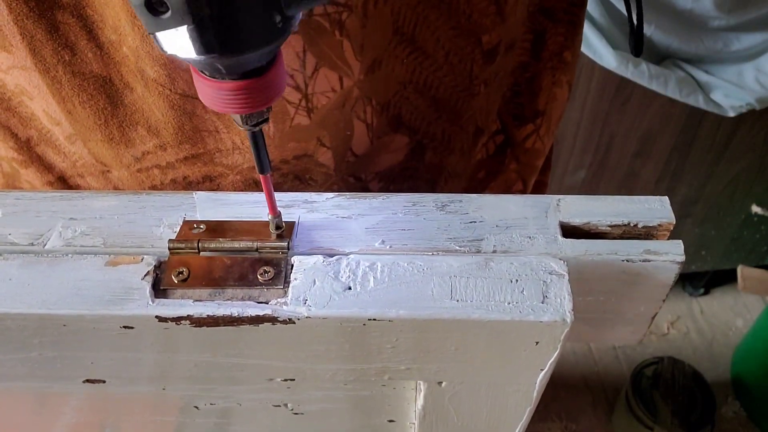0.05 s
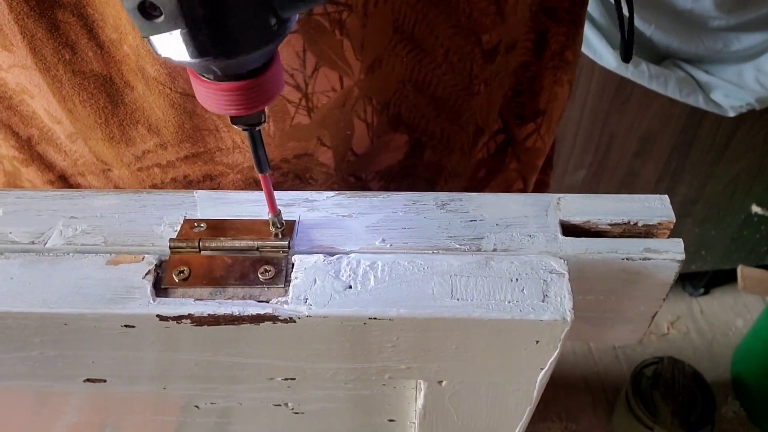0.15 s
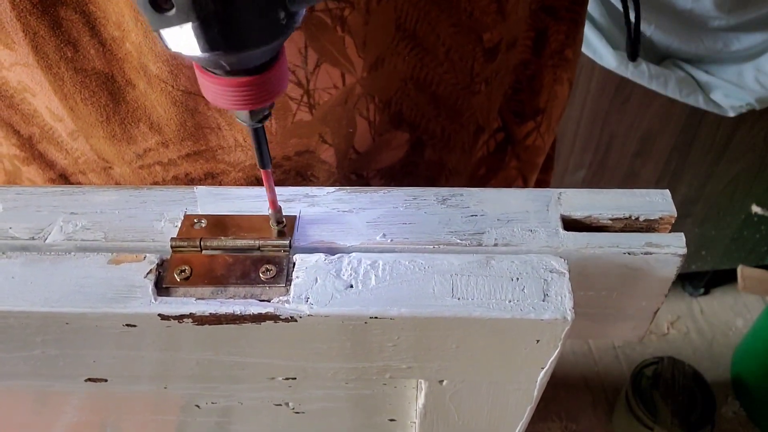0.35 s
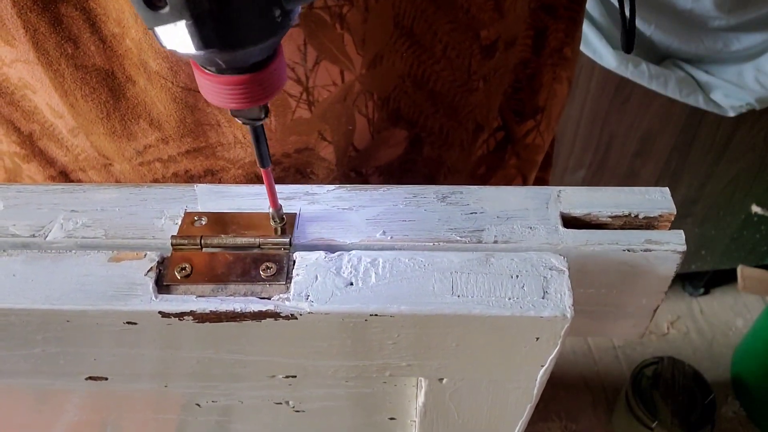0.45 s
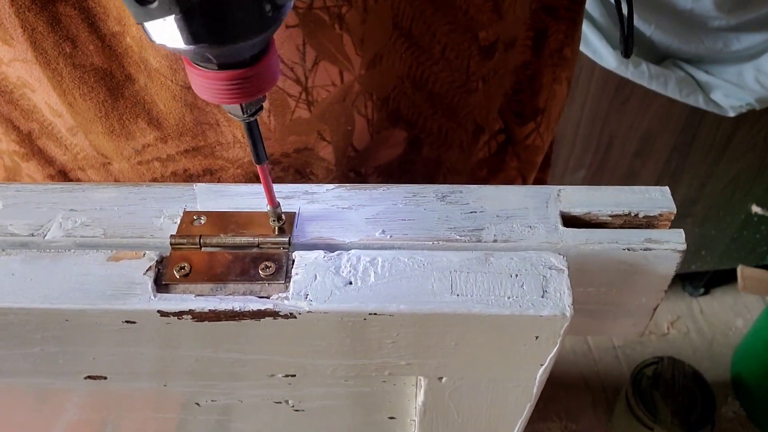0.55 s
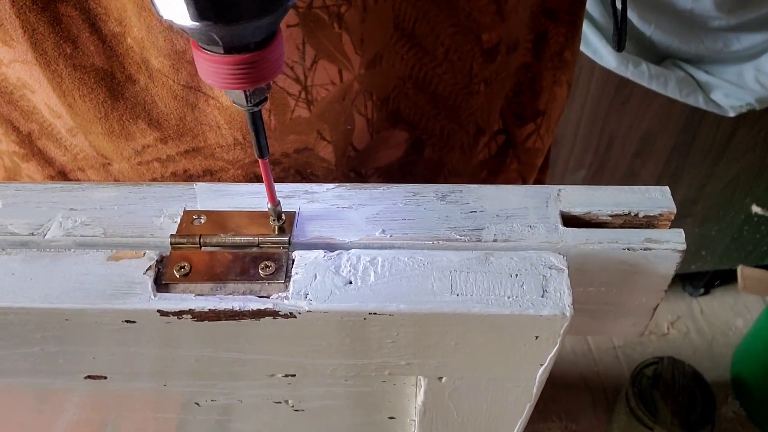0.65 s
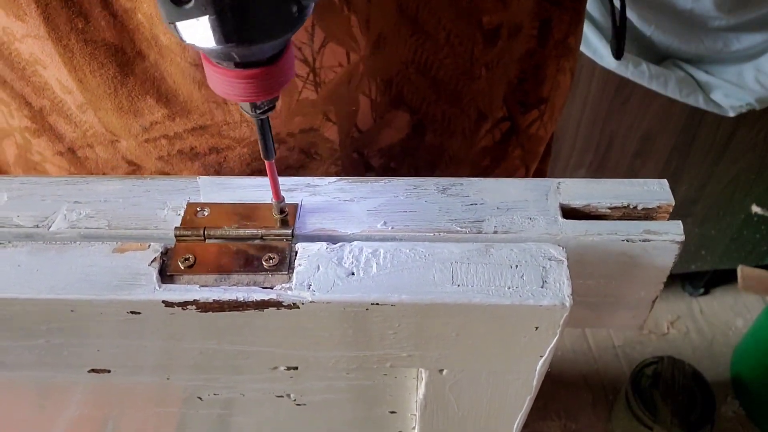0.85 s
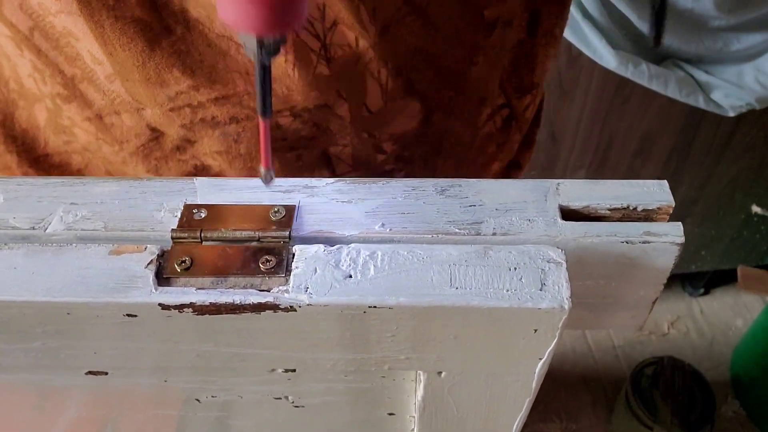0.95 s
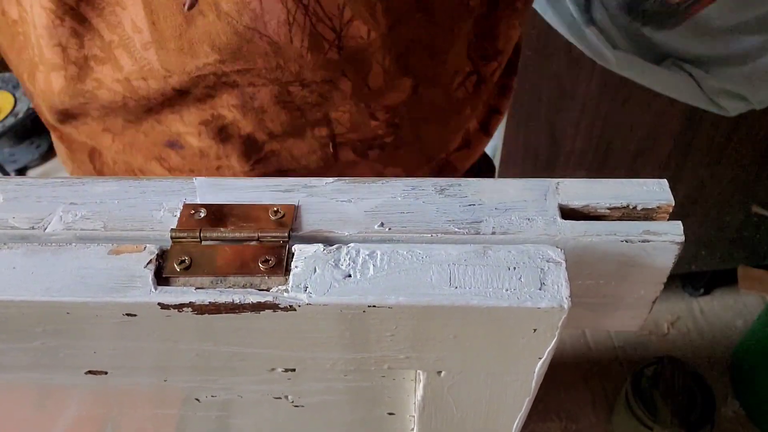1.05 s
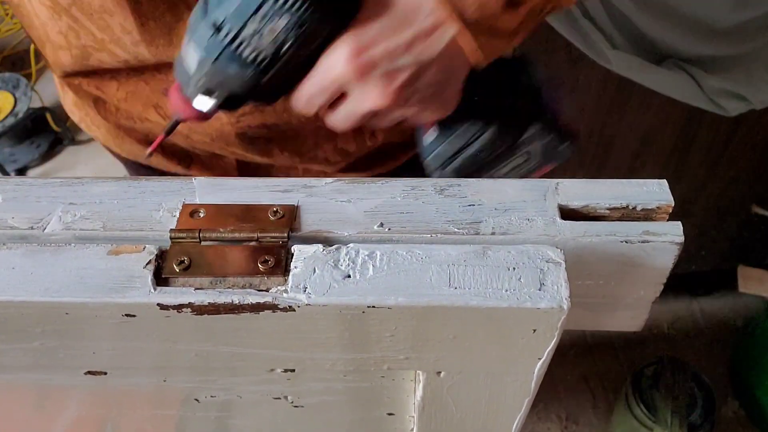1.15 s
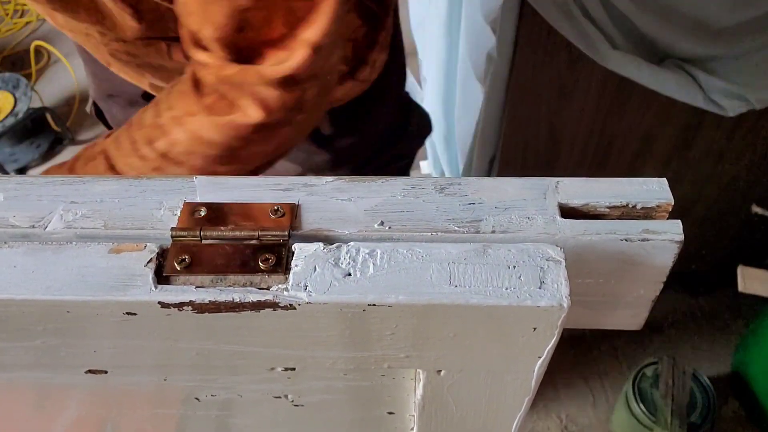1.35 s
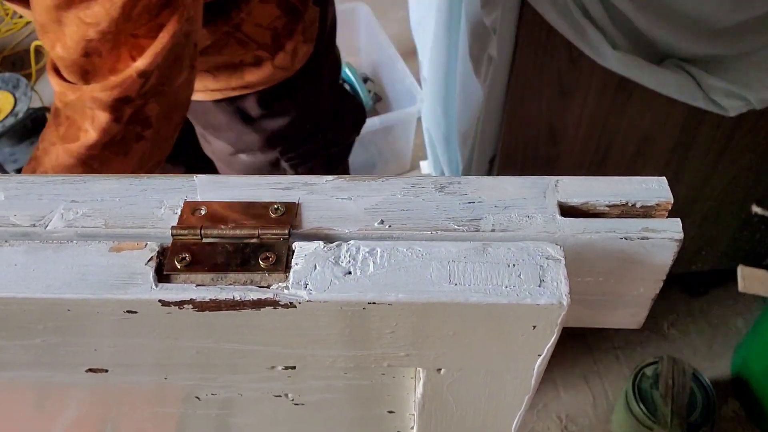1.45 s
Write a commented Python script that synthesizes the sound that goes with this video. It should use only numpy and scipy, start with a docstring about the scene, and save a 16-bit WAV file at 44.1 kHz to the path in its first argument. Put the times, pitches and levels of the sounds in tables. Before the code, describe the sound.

A cordless driver whines close by in a small room. From about 0.2 to 0.6 seconds its bit grinds and skips in a hinge screw, with rapid metallic cracks and thumps through the wooden door. A second short rattle comes at around 0.75 seconds. From 0.9 to 1.5 seconds, a few soft knocks and faint rustles follow as the tool is taken away.

```python
"""Cordless driver on a door hinge

Close by in a small room, a cordless driver turns a screw into a steel hinge on a wooden door.
The gears whine and the screw groans; the bit grinds, jumping out of the head at every quarter turn
with a steel crack and a thump that rings the door. A second short pull on the trigger rattles the bit
in the head, then soft knocks and rustles follow as the tool is taken away."""
import sys
import numpy as np
from scipy import signal
from scipy.fft import rfft, irfft, next_fast_len
from scipy.io import wavfile
from scipy.ndimage import map_coordinates

SR = 44100
rng = np.random.default_rng(int(sys.argv[2]) if len(sys.argv) > 2 else 0)


def generate_wav(sig):
    """Save sig (samples, or channels by samples) to the path in sys.argv[1] as 16-bit PCM at SR."""
    pcm = np.round(np.clip(np.atleast_2d(sig).T, -1, 1) * 32767).astype(np.int16)
    wavfile.write(sys.argv[1], SR, pcm)


N = 66150

# room tone colour (f/Hz, level/dB)
ROOM_TONE_EQ = [(50, -11.5), (200, -4.5), (1000, -11), (5000, -18), (15000, -34.5)]
# reverb time (f/Hz, t60/s)
ROOM_DECAY = [(100, .3), (300, .37), (4000, .32), (15000, .2)]
# stereo image (f/Hz, left-right correlation)
STEREO_LIKENESS = [(120, 0.94), (260, 0.96), (600, 0.062), (5000, 0.036)]
# stereo tilt (f/Hz, left minus right/dB)
STEREO_BALANCE = [(1000, 0.63), (2300, -2.5), (4800, 3.5), (12000, -1.5)]

# sleeve and tool sliding (peak t/s, width/s, level/dB)
SLIDES = [(1.092, 0.0088, -56), (1.357, 0.009, -56.5), (1.466, 0.02, -54)]
# their colour (f/Hz, level/dB)
SLIDE_EQ = [(200, -24), (1100, -12), (1700, -12), (6500, -10.5), (9000, -24), (15000, -22)]
# handling knocks (t/s, thud/dB, click/dB, thud t60/s)
KNOCK_HITS = [(0.917, -43, -44.5, 0.11), (0.99, -51, -51, 0.072), (1.102, -40.5, -40.5, 0.15),
              (1.279, -51.5, -72, 0.077), (1.3548, -44, -41, 0.04)]
# body of a knock (f/Hz, level/dB)
THUD_EQ = [(90, -27.5), (230, -6.5), (500, 0), (1200, -18), (5000, -36.5)]
# edge of a knock (f/Hz, level/dB)
CLICK_EQ = [(600, -8.5), (1500, 7), (6500, -6.5), (9000, -23)]

# modes of the door and its hinge (f/Hz, level/dB, t60/s)
DOOR_MODES = [(196, -8, .3), (264, 2, .15), (336, -4, .17), (400, -9, .24), (422, -10, .22), (540, -9, .14),
              (608, -6, .13), (1010, -16, .1), (1333, -17, .09)]
# light bumps against the door (t/s, level/dB)
BUMP_HITS = [(0, -35.5), (0.642, -47.5)]
# the shaken door (f/Hz, level/dB)
RUMBLE_EQ = [(30, -25.5), (85, -3), (240, -3), (450, -7.5), (650, -7.5), (1000, -15), (3000, -38.5)]

# the motor's run (t/s, gear noise/dB, mesh tone/dB)
MOTOR_FADERS = [(0, -42, -61), (.13, -42.5, -44), (.21, -44.5, -48.5), (.28, -32.5, -42),
                (.55, -57.5, -55.5), (.6, -86, -79.5)]
# gear noise colour (f/Hz, level/dB)
GEAR_EQ = [(130, -49.5), (330, -19.5), (1550, -26), (2100, -11.5), (2500, 0), (3100, -11.5), (4800, -17.5),
           (9200, -36), (11700, -28.5), (15300, -25)]
# partials of the loaded gears (f/Hz, level/dB)
STRAIN_PARTIALS = [(3149, -41), (3348, -45)]

# second pull on the trigger (t/s, skid/dB, door rumble/dB)
RATTLE_FADERS = [(.695, -89, -77.5), (.71, -41, -43.5), (.726, -27, -31), (.75, -20.5, -21),
                 (.79, -24.5, -21.5), (.812, -31.5, -22), (.832, -48, -32.5), (.91, -93, -52.5)]
# the skidding bit (f/Hz, level/dB)
SKID_EQ = [(400, -8), (1200, -12), (2000, -4.5), (3000, -3.5), (6300, -10), (8600, -22.5), (15000, -19.5)]
# the door under the rattle (f/Hz, level/dB)
CHATTER_EQ = [(40, -24), (100, -3.5), (210, 5), (400, -8), (600, 0), (1100, -14), (3000, -41)]
# the bit grinding in the head (t/s, door rumble/dB, scrape/dB, treble shelf/dB)
GRIND_FADERS = [(.19, -65.5, -78, -8), (.238, -27, -25.5, 0), (.268, -37, -38, -24.5),
                (.3, -26, -38.5, -7.5), (.342, -28, -26, 2.5), (.39, -19, -33, -7), (.43, -29.5, -26.5, 3),
                (.475, -26.5, -30.5, -9), (.525, -24, -28.5, 7), (.56, -30.5, -32, -13.5),
                (.585, -58.5, -50, -3)]
# steel scraping steel (f/Hz, level/dB)
SCRAPE_EQ = [(590, -28), (1000, -1), (1560, -2), (3080, 4.5), (4650, -1), (6630, -1), (8340, -13),
             (11600, -5.5), (15500, -9)]

# the bit jumps out and slams back (t/s, thump/dB, crack/dB, tick/dB, bit ring/dB)
SLIP_HITS = [(0.284, -20, -12, -26, -29.5), (0.3256, -19.5, -16.5, -19, -28), (0.364, -18.5, -21, -42, -46),
             (0.372, -22, -15.5, -33, -28), (0.4115, -22, -8.5, -11.5, -19),
             (0.4539, -16.5, -14.5, -22, -31.5), (0.4987, -17, -7.5, -17.5, -31),
             (0.5428, -18, -9, -14.5, -14), (0.7425, -26, -23, -33.5, -28),
             (0.7471, -27.5, -13, -38, -33.5), (0.7636, -23, -16, -27, -41.5)]
# wooden low end of a slip (f/Hz, level/dB)
THUMP_EQ = [(40, -28), (150, -2.5), (270, 9), (430, -4), (650, 1.5), (1100, -15.5), (4000, -28)]
# its steel midrange (f/Hz, level/dB)
CRACK_EQ = [(300, -25.5), (1200, 0.5), (1900, -5), (3200, 1.5), (4400, -8), (6700, -3), (9000, -17.5),
            (15000, -33)]
# its bright top (f/Hz, level/dB)
TICK_EQ = [(3000, -35), (8000, -12), (11500, 9.5), (15500, 1)]
# modes of the bit (f/Hz, level/dB, t60/s)
BIT_MODES = [(5530, 2, .011), (6770, -13, .02)]

HEAVY_RING_DB, LIGHT_RING_DB = -5, -10  # door ring under the tool's full weight, and under light contact
HIT_ATTACK_S = .0004


def amp(db):
    """Decibels to gain."""
    return 10 ** (np.asarray(db) / 20)


def unit(x):
    """Scale to rms 1."""
    return x / np.sqrt(np.mean(x ** 2) + 1e-20)


def along(points, hz):
    """Read a (f/Hz, value) curve on a log frequency axis."""
    freqs, values = np.transpose(points)
    return np.interp(np.log(hz + 1), np.log(freqs + 1), values)


def clock():
    """Time of every sample in seconds."""
    return np.arange(N) / SR


def faders(rows):
    """A gain curve for each dB column, silent outside the rows."""
    times, *columns = np.transpose(rows)
    return [amp(np.interp(clock(), times, db, left=-140, right=-140)) for db in columns]


def decay(t, t60):
    """Exponential fall of 60 dB in t60."""
    return np.exp(-np.log(1000) * t / t60)


def swell(at, width):
    """A smooth rise and fall around a moment."""
    return np.exp(-((clock() - at) / width) ** 2 / 2)


def bursts(times, dbs, t60, attack):
    """Envelope of hits with a quick rise and an exponential fall."""
    age = np.maximum(clock() - np.asarray(times)[:, None], 0)
    return amp(dbs) @ (decay(age, t60) * (1 - np.exp(-age / attack)))


def wobble(rate):
    """A smooth random curve, rate points a second."""
    return map_coordinates(rng.standard_normal(N // 20), [clock() * rate], mode="wrap")


def flutter(depth_db, rate):
    """A randomly wavering gain of rms 1."""
    return unit(amp(depth_db * wobble(rate)))


def tone(hz, wander_hz):
    """An unsteady sine of rms 1."""
    return np.sqrt(2) * np.sin(2 * np.pi * np.cumsum(hz + wander_hz * wobble(120)) / SR)


def filtered(x, response):
    """Apply a frequency response."""
    size = 2 * next_fast_len(N)
    return irfft(rfft(x, size) * response(np.fft.rfftfreq(size, 1 / SR)), size)[..., :N]


def eq(x, points):
    """Minimum-phase EQ of unit energy, shaped by (f/Hz, level/dB) points."""
    def response(hz):
        gain = unit(amp(along(points, hz)))
        cepstrum = irfft(np.log(gain))
        cepstrum[1:len(hz) - 1] *= 2
        cepstrum[len(hz):] = 0
        return np.exp(rfft(cepstrum))
    return filtered(x, response)


def treble_shelf(x, gain, corner_hz=7700):
    """Ride the treble with a gain per sample."""
    return x + (gain - 1) * filtered(x, lambda hz: 1 - 1 / (1 + (hz / corner_hz) ** 8))


def convolve(x, tail):
    """Convolve with a tail scaled to unit energy in each channel."""
    tail = np.atleast_2d(tail)
    tail = tail / np.linalg.norm(tail, axis=1, keepdims=True)
    return signal.fftconvolve(np.atleast_2d(x), tail, axes=1)[:, :N]


def spread(pair):
    """Mid and side become left and right: narrow bass, wide treble."""
    def weights(hz):
        angle = np.arccos(along(STEREO_LIKENESS, hz)) / 2
        return np.array([np.cos(angle), np.sin(angle)])
    mid, side = filtered(np.array(pair), weights)
    return np.array([mid + side, mid - side])


def noise():
    """White stereo noise."""
    return spread(rng.standard_normal((2, N)))


def grains(shape=N, per_second=9000):
    """Friction texture: dense tiny contacts of uneven size, rms 1."""
    contacts = rng.random(shape) < per_second / SR
    return unit(contacts * rng.standard_normal(shape))


def stereo_grains():
    """Friction texture spread across left and right."""
    return spread(grains((2, N)))


def room_tone():
    """A quiet, dark bed of noise."""
    return amp(-73.5) * eq(noise(), ROOM_TONE_EQ)


def reverb(send, fade_in_s=.0027):
    """The small room's diffuse tail, whose treble dies first."""
    hz, t, spectrum = signal.stft(noise()[:, :N // 2], SR, nperseg=256)
    spectrum = spectrum * decay(t, along(ROOM_DECAY, hz)[:, None])
    _, tail = signal.istft(spectrum, SR, nperseg=256)
    fade_in = np.minimum(np.arange(tail.shape[1]) / SR / fade_in_s, 1)
    return convolve(send, tail * fade_in)


def rustles():
    """Sleeve and tool slide in brief swishes, the last with a short squeak."""
    slide = sum(amp(db) * swell(at, width) for at, width, db in SLIDES)
    squeak = amp(-59) * swell(at=1.464, width=.013) * tone(1200, wander_hz=55)
    return slide * eq(stereo_grains(), SLIDE_EQ) + squeak


def knocks(rise_per_t60=.066):
    """Handling knocks ring the tool's hollow shell; each rises in proportion to how long it rings, so the
    longer knocks are also slower to rise."""
    hit = lambda at, db, t60: bursts([at], [db], t60, rise_per_t60 * t60)
    thuds = sum(hit(at, db, t60) for at, db, _, t60 in KNOCK_HITS)
    clicks = sum(hit(at, db, t60 / 2) for at, _, db, t60 in KNOCK_HITS)
    body = eq(noise(), THUD_EQ)
    shell = amp(-8) * tone(1065, wander_hz=29.1)
    return thuds * (body + shell) + eq(clicks * noise(), CLICK_EQ)


def drone():
    """A low note dies away as the scene opens."""
    return amp(-51.5) * decay(clock(), t60=.55) * tone(160, wander_hz=2)


def door(force, colour, ring_db):
    """The door answers a force with a dead thud and ringing modes; reflections off its face add width."""
    t = clock()
    modes = sum(amp(db) * decay(t, t60) * np.cos(2 * np.pi * hz * t) for hz, db, t60 in DOOR_MODES)
    mid = eq(force, colour) + amp(ring_db) * convolve(force, modes)[0]
    reflections = rng.standard_normal(N) * decay(t, t60=.031)
    side = amp(-1.5) * convolve(mid, reflections)[0]
    return spread([mid, side])


def bumps():
    """Light bumps shake the door."""
    times, dbs = np.transpose(BUMP_HITS)
    force = bursts(times, dbs, t60=.099, attack=HIT_ATTACK_S) * grains()
    return door(force, RUMBLE_EQ, LIGHT_RING_DB)


def groan():
    """The screw sticks and slips in the wood at a low pitch as it takes up the load."""
    return amp(-32) * swell(at=.243, width=.014) * tone(332, wander_hz=15)


def motor(mesh_hz=2436, shaft_hz=78, pulse_db=2, whistle_hz=15090):
    """Gear noise, mesh tone and whistle pulse with the shaft; higher partials come in under load."""
    gear_gain, mesh_gain = faders(MOTOR_FADERS)
    pulse = amp(pulse_db * (tone(shaft_hz, wander_hz=6) + wobble(150)) / 2)
    load = swell(at=.32, width=.03)
    # the speed control whistles until the trigger is fully in
    whistle_gain = gear_gain * amp(-8) * np.clip((.31 - clock()) / .06, 0, 1)

    def whine(hz, wander_hz=12):
        return flutter(depth_db=2, rate=50) * tone(hz, wander_hz)

    def voice():
        mesh = mesh_gain * whine(mesh_hz)
        strain = load * sum(amp(db) * whine(hz) for hz, db in STRAIN_PARTIALS)
        return mesh + strain + whistle_gain * whine(whistle_hz, wander_hz=45)

    return pulse * (spread([voice(), voice()]) + gear_gain * eq(noise(), GEAR_EQ))


def bit_rattle(wing_hz=124.2, ripple_db=5, peak_s=.75, dulling_db_per_s=104):
    """The bit skids fast over the head, one knock per passing wing, and dulls as the motor slows."""
    skid_gain, rumble_gain = faders(RATTLE_FADERS)
    wings = np.cumsum(wing_hz * (1 + .15 * wobble(97))) / SR
    taps = unit(np.diff(np.floor(wings), prepend=0) * flutter(depth_db=1.2, rate=130))
    ripple = unit(amp(-ripple_db * (wings % 1)))
    skid = eq(skid_gain * ripple * stereo_grains(), SKID_EQ)
    treble_db = np.clip(-dulling_db_per_s * (clock() - peak_s), -10, 4)
    force = -rumble_gain * unit(taps + grains())
    return treble_shelf(skid, amp(treble_db)) + door(force, CHATTER_EQ, LIGHT_RING_DB) / 2


def bit_grind():
    """Between jumps the bit scrapes up the flanks of the head and shakes the door."""
    rumble_gain, scrape_gain, treble_gain = faders(GRIND_FADERS)
    roughness = flutter(depth_db=1.2, rate=250)
    rumble = door(rumble_gain * grains(), RUMBLE_EQ, HEAVY_RING_DB) / 2
    scrape = eq(scrape_gain * roughness * stereo_grains(), SCRAPE_EQ)
    return rumble + treble_shelf(scrape, treble_gain)


def bit_slips(plate_hz=1900, wander_hz=45, crack_t60=.011, crack_lag_s=.0003):
    """Each jump of the bit thumps the door, cracks steel on steel and rings the bit and hinge plate."""
    times, thump_db, crack_db, tick_db, ring_db = np.transpose(SLIP_HITS)
    force = np.zeros(N)
    force[np.round(times * SR).astype(int)] = -amp(thump_db) * np.sqrt(SR * .004)  # 4 ms worth of energy
    hits = lambda dbs, t60: bursts(times + crack_lag_s, dbs, t60, HIT_ATTACK_S)
    bit = sum(amp(db) * tone(hz, wander_hz) * hits(ring_db, t60) for hz, db, t60 in BIT_MODES)
    plate = spread([tone(plate_hz, wander_hz) for _ in range(2)]) * hits(crack_db - 15, t60=.045)
    cracks = eq(noise() * hits(crack_db, crack_t60), CRACK_EQ)
    ticks = eq(noise() * hits(tick_db, crack_t60), TICK_EQ)
    return door(force, THUMP_EQ, HEAVY_RING_DB) + cracks + ticks + bit + plate


def scene():
    """The mix: tool and door fairly dry, the handling wetter, room tone underneath."""
    work = motor() + groan() + bit_slips() + bit_grind() + bit_rattle() + bumps() + drone()
    handling = knocks() + rustles()
    send = amp(-20.5) * work + amp(-10) * handling
    return work + handling + reverb(send) + room_tone()


def record(dry, top_hz=15750):
    """Two slightly unlike microphones and a steep high cut."""
    def response(hz):
        balance = amp(along(STEREO_BALANCE, hz) * np.array([[.5], [-.5]]))
        return balance / np.sqrt(1 + (hz / top_hz) ** 360)
    return filtered(dry, response)


dry = scene()
out = record(dry)
generate_wav(out)
```